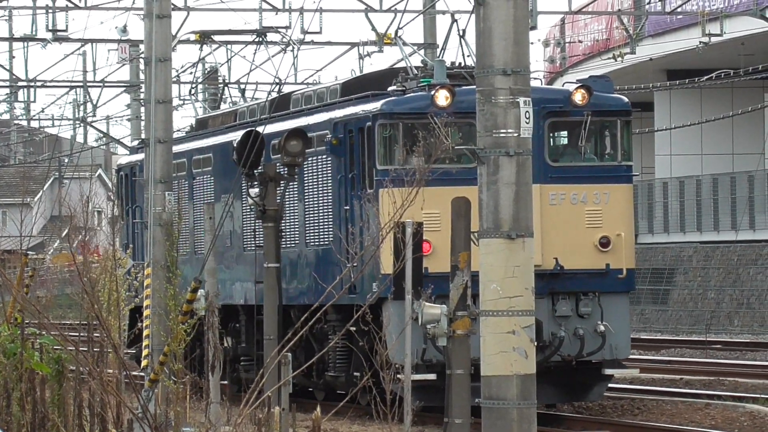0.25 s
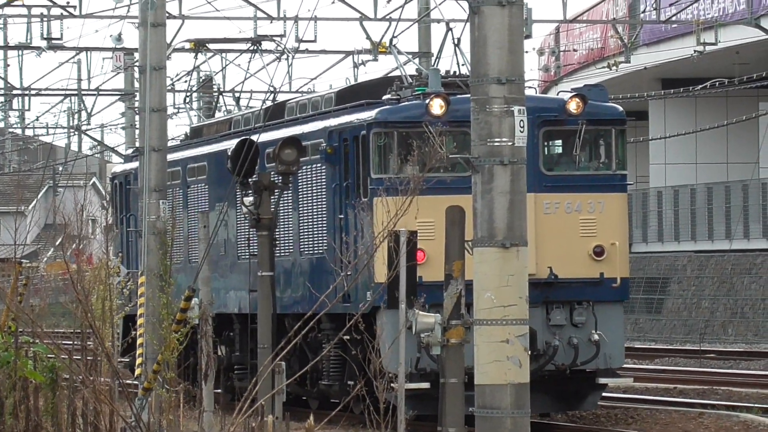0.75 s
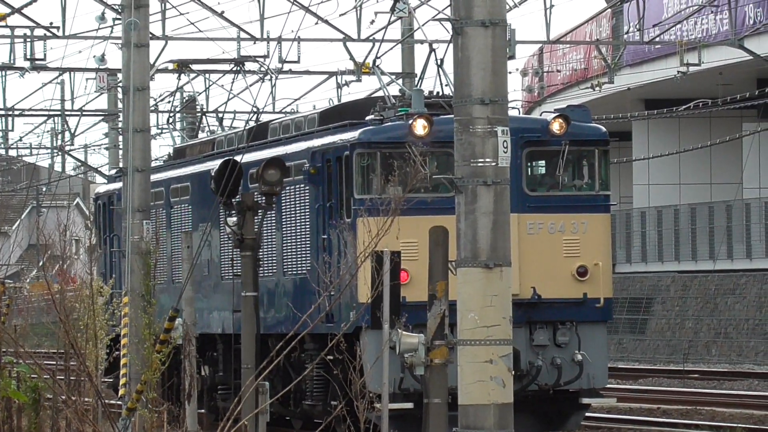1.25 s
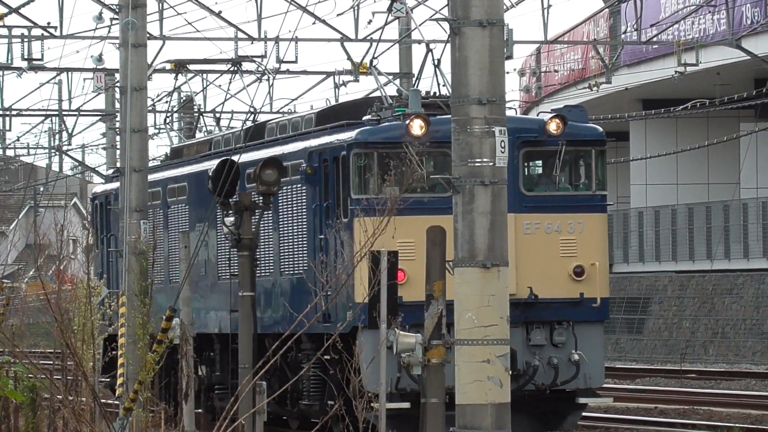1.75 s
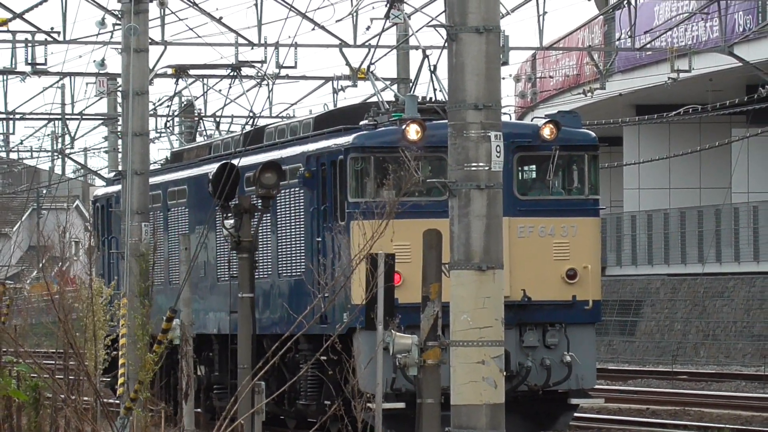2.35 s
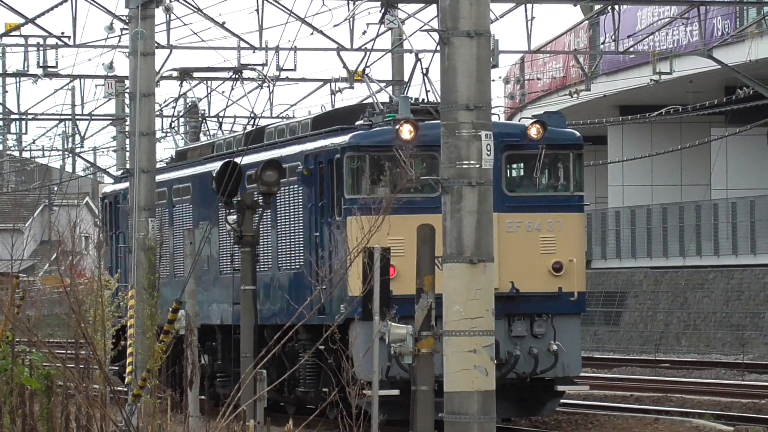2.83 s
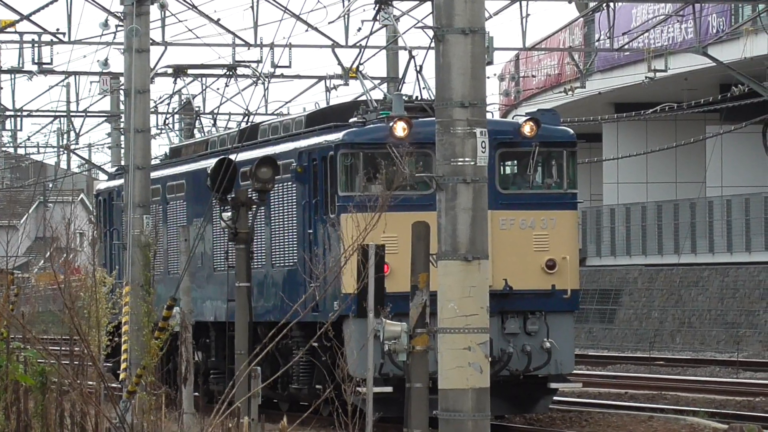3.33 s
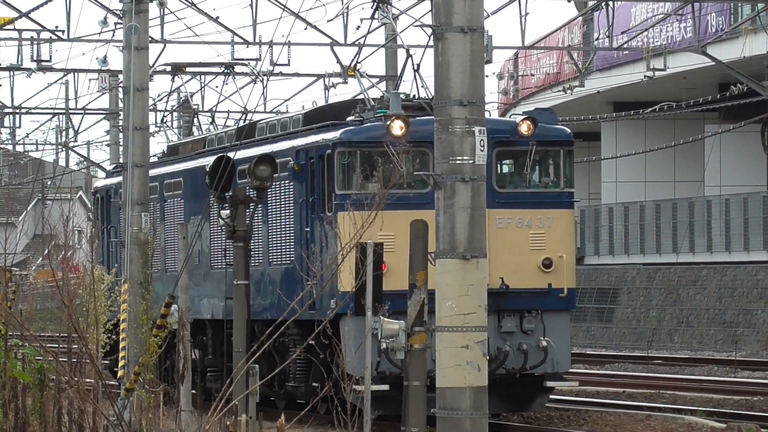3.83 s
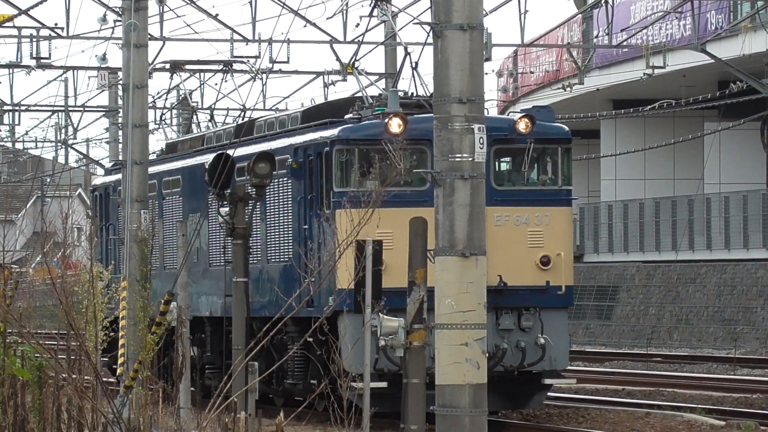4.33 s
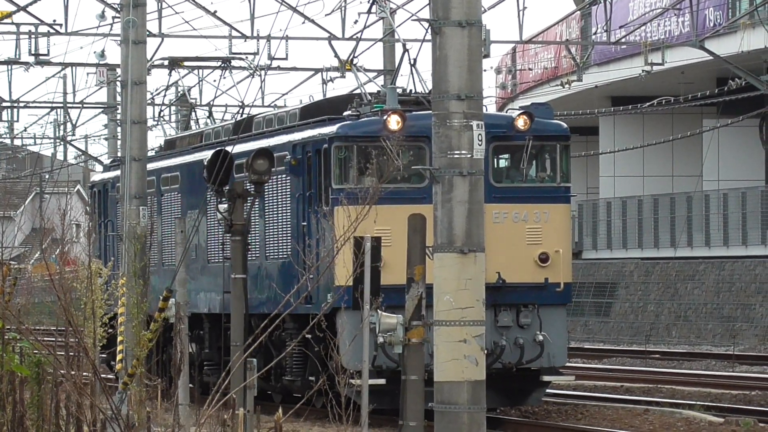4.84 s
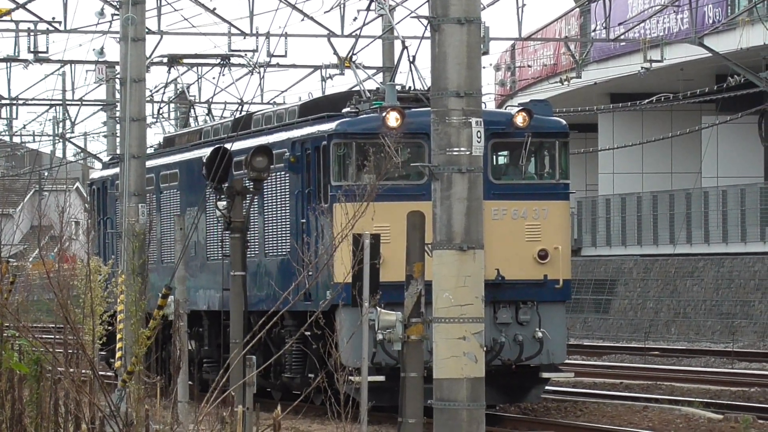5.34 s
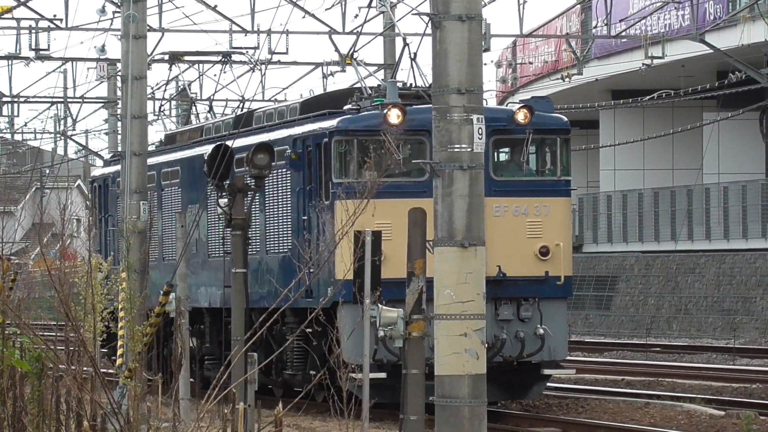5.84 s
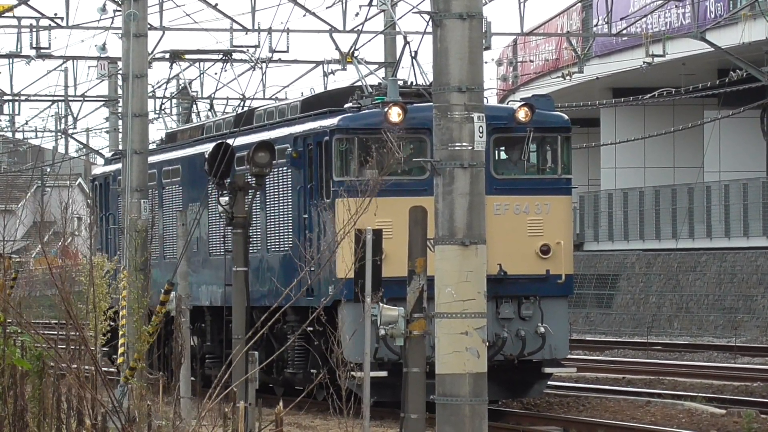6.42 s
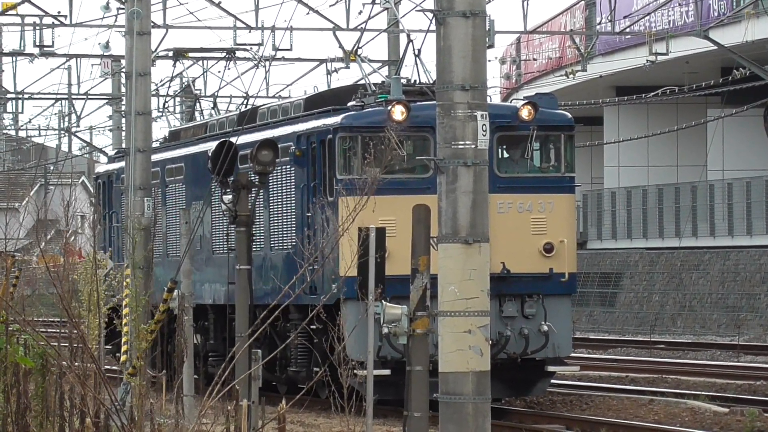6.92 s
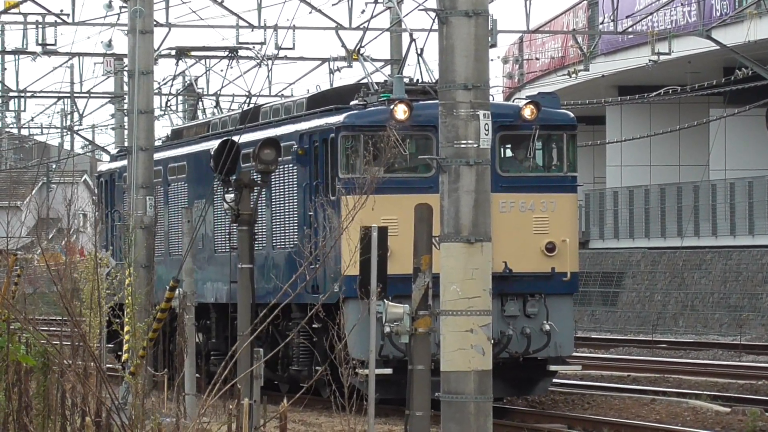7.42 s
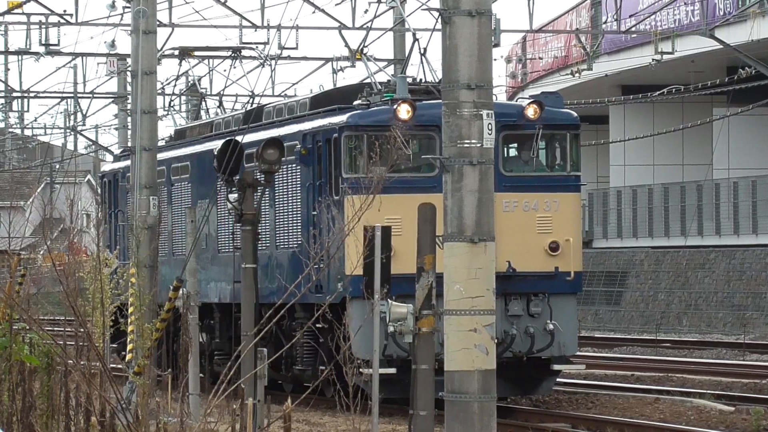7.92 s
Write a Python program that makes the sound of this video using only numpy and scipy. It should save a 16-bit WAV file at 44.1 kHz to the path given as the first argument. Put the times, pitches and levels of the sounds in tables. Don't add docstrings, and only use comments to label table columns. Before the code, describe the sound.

An electric locomotive's cooling fans drone in a steady beating hum with rushing air, then brakes squeal shrilly and air hisses out briefly.

```python
import sys
import numpy as np
from scipy import signal
from scipy.fft import rfft, irfft, next_fast_len
from scipy.io import wavfile
from scipy.ndimage import uniform_filter1d, minimum_filter1d, map_coordinates

SR = 44100
rng = np.random.default_rng(int(sys.argv[2]) if len(sys.argv) > 2 else 0)


def linear_from_db(decibels):
    return 10 ** (np.asarray(decibels, float) / 20)


def materialize(psi):
    bounded = np.clip(np.atleast_2d(psi).T, -1, 1)
    quanta = np.round(bounded * 32767).astype(np.int16)
    wavfile.write(sys.argv[1], SR, quanta)


N = 360285
SOUND_SPEED = 343
EARS = np.c_[[.5, -.5]]


def unit(x):
    return x / np.sqrt(np.mean(x ** 2) + 1e-20)


def along(points, hz):
    f, v = np.transpose(points)
    return np.interp(np.log(hz + 1), np.log(f + 1), v)


def curves(rows):
    s, *cols = np.transpose(rows)
    return [np.interp(np.arange(N) / SR, s, c) for c in cols]


def during(rows):
    t = np.arange(N) / SR
    return np.clip(np.minimum(t - rows[0][0], rows[-1][0] - t) / 0.015, 0, 1)


def wobble(rate, count=1):
    knots = rng.standard_normal((count, 400))
    coarse = np.arange(0, N + 64, 64)
    smooth = [map_coordinates(k, [coarse * rate / SR], order=2) for k in knots]
    return np.array([np.interp(np.arange(N), coarse, curve) for curve in smooth])


def swell(peak_s, hold_s, db, rise, fall):
    t = np.arange(N) / SR - peak_s
    return db - rise * np.clip(-t, 0, None) - fall * np.clip(t - hold_s, 0, None)


def filtered(x, response):
    m = next_fast_len(N + SR // 2)
    return irfft(rfft(x, m) * response(np.fft.rfftfreq(m, 1 / SR)), m)[..., :N]


def modes(table):
    def response(f):
        total = 0
        for k, (center, width, db) in enumerate(table):
            damping = 1j * f * width
            total = total + (-1) ** k * linear_from_db(db) * damping / (center * center - f * f + damping)
        return total
    return response


def rush(spectrum, alike, patchy_db, band):
    z = signal.stft(rng.standard_normal((2, N)), nperseg=512)[2]
    field = uniform_filter1d(rng.standard_normal(z.shape[1:]), size=6, axis=0)
    field = uniform_filter1d(field, size=14, axis=1)
    pair = signal.istft(z * linear_from_db(patchy_db * unit(field)), nperseg=512)[1][:, :N]
    closed = [(spectrum[0][0] / 2, -120)] + list(spectrum) + [(spectrum[-1][0] * 2, -120)]

    def shape(hz):
        turn = np.arccos(np.clip(along(alike, hz), -1, 1)) / 2
        return linear_from_db(along(closed, hz)) * [np.cos(turn), np.sin(turn)]

    mid, side = filtered(pair, shape)
    inside = filtered(mid, lambda hz: (hz > band[0]) & (hz < band[1]))
    return np.array([mid + side, mid - side]) / np.std(inside)


# (time [s], speed toward the camera [m/s])
APPROACH = [
    (0, 0),
    (4.5, 0),
    (5.5, .41),
    (9, .45),
]


def nearness():
    distance_m = 25
    return distance_m / (distance_m - np.cumsum(curves(APPROACH)[0]) / SR)


BLADES_HZ = [273.75, 282.97, 294.45, 303.25, 306.89, 311.35]
# (level [dB rms], five times)
BLADES_DB = [(-44, -46.5, -55, -62.5, -59.5), (-51, -46, -50, -55, -59), (-44.5, -43.5, -52, -58, -56),
             (-51.5, -49.5, -48.5, -52, -59), (-51, -44, -45.5, -52.5, -54),
             (-48, -38.5, -49.5, -60, -67.5)]
UPPER_DB = [-68, -69, -79]
FACING_DB_PER_S = [0, -0.5, -0.22, -0.05, -0.99, 0.3]
# (time [s], extra path [m])
BOUNCE = [
    (0, .12),
    (2.5, .135),
    (3.2, .185),
    (4.2, .185),
    (4.9, .07),
    (8.2, .03),
]
BOUNCE_SHIFT_M = [-.02, -.01, -.01, 0, 0, .005]


def fans():
    clock = np.cumsum(1 + curves(APPROACH)[0] / SOUND_SPEED) / SR
    path_m = curves(BOUNCE)[0]
    share = .5
    out = np.zeros((2, N))
    t = (np.arange(N) - N / 2) / SR
    for blade_hz, levels_db, shift_m, facing in zip(BLADES_HZ, BLADES_DB, BOUNCE_SHIFT_M, FACING_DB_PER_S):
        for k, db in enumerate([*levels_db, *UPPER_DB]):
            hz = (k + 1) * blade_hz
            drift = wobble(rate=0.775, count=3)
            start, apart, pan = rng.standard_normal(size=3)
            lag = 2 * np.pi * hz * (path_m + shift_m) / SOUND_SPEED
            comb = np.sqrt(1 + share ** 2 + 2 * share * np.cos(lag))
            ear_db = (1.5 * pan + 1.5 * drift[1]) * EARS
            gain = linear_from_db(db + facing * t + 1.5 * drift[0] + ear_db)
            ear_phase = (0.075 * apart + 0.19 * drift[2]) * EARS
            phase = 2 * np.pi * hz * clock + 2 * start + ear_phase + 0.2 * wobble(rate=4)
            out += np.sqrt(2) * comb * gain * np.sin(phase)
    return out * nearness()


# (frequency [Hz], level [dB rms])
WHINES = [(198, -52), (960, -57), (974, -59), (9168, -80), (9195, -73), (13065, -88)]


def motors():
    t = np.arange(N) / SR
    total = 0
    for hz, db in WHINES:
        gain = np.sqrt(2) * linear_from_db(db + 1.6 * wobble(rate=1.8, count=2))
        total = total + gain * np.sin(2 * np.pi * hz * t + 0.78 * wobble(rate=2.2, count=2))
    return total


# (frequency [Hz], level [dB per Hz])
RUMBLE = [(12, -58), (20, -18), (234, 2.5), (260, -2.5), (340, -4), (570, -120)]
# (frequency [Hz], level [dB per Hz])
DUCT = [(150, -38.5), (240, -9), (300, -1.5), (345, -7), (365, -8), (440, -11.5), (520, -6), (600, 0),
        (720, -8.5), (770, -10.5), (1250, -14.5), (1300, -16.5), (1600, -21.5), (2250, -33.5)]
# (frequency [Hz], level [dB per Hz])
HISS = [(1180, -40), (2000, -7), (2120, -4), (2350, -9.5), (2540, -7.5), (2940, -10.5), (3670, -9.5),
        (6030, -24), (8790, -18.5), (9180, -20), (10000, -24.5), (13500, -31.5), (15500, -34)]
# (frequency [Hz], left-right likeness [0-1])
ALIKE = [(30, .55), (80, 0.9), (130, 1), (290, 0.88), (640, 0.77), (1410, 0.56), (3100, 0.57), (6820, 0.11),
         (15000, .15)]


def air():
    rumble = linear_from_db(-39.5) * rush(RUMBLE, ALIKE, patchy_db=.8, band=(60, 240))
    duct = linear_from_db(-40) * rush(DUCT, ALIKE, patchy_db=1.0, band=(650, 800))
    hiss = linear_from_db(-58.5) * rush(HISS, ALIKE, patchy_db=1.0, band=(2300, 3400))
    return (rumble + duct + hiss) * nearness()


# (time [s], peak level [dB])
TICK = [
    (0.118, -33),
]
# (frequency [Hz], width [Hz], level [dB])
TICK_MODES = [(3900, 1200, 0), (7460, 2500, -2), (9050, 1540, 4), (12500, 2500, -22)]


def tick():
    t = np.arange(400) / SR
    blows = np.zeros(N)
    for s, db in TICK:
        decay = linear_from_db(db + 5 - 60 * t / 0.0094)
        blows[round(s * SR):][:len(t)] = decay * rng.standard_normal(len(t))
    return filtered(blows, modes(TICK_MODES))


def walls(x, t60, delay):
    t = np.arange(SR) / SR
    tail = rng.standard_normal((2, SR)) * linear_from_db(-60 * t / t60) * (t > delay)
    return signal.fftconvolve(x[None], tail / np.linalg.norm(tail[0]), axes=1)[:, :N]


# (time [s], frequency [Hz], level [dB])
SHOE = [
    (4.25, 7015, -72),
    (4.3, 7017, -42),
    (4.42, 7030, -36),
    (4.6, 7078, -36),
    (4.69, 7108, -29),
    (4.76, 7118, -42),
    (4.86, 7126, -45),
    (5.0, 7132, -57),
    (5.18, 7138, -64),
]
# (peak time [s], hold [s], peak level [dB], rise [dB/s], fall [dB/s])
SWELLS = [
    (4.605, .035, -44, 90, 78),
    (4.39, .05, -45, 600, 70),
    (4.385, .23, -51.5, 500, 95),
]
MIXING = [(2, 0, 0), (1, 1, 0), (1, 0, 1), (0, 2, 0), (0, 1, 1), (1, 0, -1), (0, 0, 3)]
MIXING_DB = [-26, -11, -18, -15, -7, -14, -24]
# (frequency [Hz], width [Hz], level [dB])
TYRE = [(3494, 30, -11), (3620, 30, -10), (4204, 25, -7), (6150, 70, -20), (7310, 90, -9), (7840, 60, -13),
        (8020, 120, -17), (8620, 30, -10), (8710, 25, -8), (8890, 18, 2), (9140, 16, 0), (9440, 16, -4),
        (9665, 18, 1), (10100, 300, -20), (10400, 30, -14), (10600, 60, -12)]
# (frequency [Hz], width [Hz], level [dB])
GRIND = [(2750, 300, -12), (3300, 460, -25)]


def squeal():
    middle_hz, low_hz = 5274, 4386
    main_hz, main_db = curves(SHOE)
    middle_db, low_db, scrape_db = [swell(*row) for row in SWELLS]
    t = np.arange(N) / SR
    grip = np.clip((t - 4.37) / 0.06, .05, 1)
    turns = np.array([np.cumsum(main_hz) / SR, middle_hz * t, low_hz * t])
    turns = turns + np.c_[[0.2, .15, .17]] * grip * wobble(rate=70, count=3)
    levels_db = np.array([main_db, middle_db, low_db])
    levels_db = levels_db + np.c_[[4, 3, 3]] * grip * wobble(rate=60, count=3)
    sound = np.sqrt(2) * np.sum(linear_from_db(levels_db) * np.sin(2 * np.pi * turns), axis=0)
    for times, db in zip(MIXING, MIXING_DB):
        weight = np.abs(times) / np.sum(np.abs(times))
        sound += linear_from_db(db + weight @ levels_db) * np.sin(2 * np.pi * (np.array(times) @ turns))
    noise = rng.standard_normal(N)
    ring = modes(TYRE + GRIND)
    scale = np.std(filtered(noise, ring))
    rubbing = noise * during(SHOE) * linear_from_db(scrape_db + 5.0 + 3 * wobble(rate=25)[0])
    return during(SHOE) * sound + filtered(rubbing, ring) / scale


# (start [s], length [s], frequency [Hz], level [dB])
FLARES = [(4.37, .055, 9690, -49), (4.375, .015, 9440, -53), (4.43, .03, 4195, -49),
          (4.445, .04, 9440, -48), (4.5, .1, 9140, -49), (4.51, .08, 9660, -45), (4.52, .1, 8890, -44),
          (4.55, .09, 3600, -56), (4.61, .04, 10600, -55), (4.63, .1, 3480, -57), (4.44, .07, 2660, -58)]


def flares():
    t = np.arange(N) / SR
    waver = wobble(rate=26, count=len(FLARES))
    total = 0
    for (s, length, hz, db), w in zip(FLARES, waver):
        level_db = swell(s + .01, length, db, rise=600, fall=400) + 3.5 * w
        total = total + np.sqrt(2) * linear_from_db(level_db) * np.sin(2 * np.pi * hz * t + 1.0 * w)
    return total


# (frequency [Hz], level [dB per Hz])
JET = [(1470, -34), (2500, -4), (3190, -6), (3890, -1), (5400, -5), (5700, -8), (8730, -0.5), (12000, -11),
       (14100, -22), (15500, -30)]


def vent():
    vent_s, open_s, fill_s, shut_s = 5.11, .05, .15, 5.56
    t = np.arange(N) / SR
    after = lambda s: np.clip(t - s, 0, None)
    level_db = -48.8 + .3 * wobble(rate=37)[0]
    level_db -= 4.5 * np.clip(1 - after(vent_s + open_s) / fill_s, 0, 1)
    level_db -= 7 * after(vent_s + open_s + fill_s)
    level_db -= 2.5 * (1 - np.exp(-after(shut_s) / .03))
    level_db -= 36 * after(shut_s)
    opening = np.clip(after(vent_s) / open_s, 0, 1)
    jet = rush(JET, [(3000, 0.46), (7000, 0.12)], patchy_db=.7, band=(6000, 12000))
    return opening * linear_from_db(level_db) * jet


def scene():
    wheel, brief, click = squeal(), linear_from_db(-1.5) * flares(), tick()
    direct = (wheel + brief) * linear_from_db([[-4], [-5.5]])
    echo = linear_from_db(-5) * walls(wheel + linear_from_db(-8) * brief, t60=0.98, delay=.02)
    near = click * linear_from_db([[.4], [-.4]]) + linear_from_db(-16) * walls(click, t60=.05, delay=0.0009)
    return fans() + motors() + air() + near + direct + echo + vent()


# (frequency [Hz], left minus right [dB])
LEAN = [(60, -1.5), (130, -3), (290, 1), (640, 1.0), (1410, -1), (3100, -2), (6820, 1), (15000, 1)]
# (frequency [Hz], left leads by [rad])
LEAD = [(35, 1.5), (70, 1.1), (110, .6), (170, .3), (430, .3), (1300, .15), (3000, 0)]


def microphones(x):
    def response(hz):
        ports = linear_from_db(along(LEAN, hz) * EARS) * np.exp(1j * along(LEAD, hz) * EARS)
        return ports / np.sqrt(1 + (30 / (hz + 1)) ** 8)
    return filtered(x, response)


# (frequency [Hz], level relative to the usual [dB])
QUIET = [(4300, -12), (5200, -5), (6200, -2.2), (7500, -3.5), (9000, -6), (11000, -2.6), (13000, -1.9),
         (15000, -.5)]


def starve(x):
    hz, _, z = signal.stft(x, SR, nperseg=1024)
    local = uniform_filter1d(np.mean(np.abs(z) ** 2, axis=0), size=4, axis=0)
    local = uniform_filter1d(local, size=5, axis=1)
    over_db = 10 * np.log10(np.abs(local) / np.median(local, axis=1, keepdims=True) + 1e-20)
    whistle_db = minimum_filter1d(over_db[hz > 5000], size=7, origin=3).max(axis=0)
    strain = np.clip((whistle_db - 23) / 9, 0, 1)
    bar_db = along(QUIET, hz)[:, None] + 5.5 * strain
    kept = np.clip(over_db - bar_db + .5, .02, 1)
    kept[hz < QUIET[0][0]] = 1
    return signal.istft(z * kept, SR, nperseg=1024)[1][:, :N]


def low_pass(x):
    return signal.sosfilt(signal.butter(12, 15440, fs=SR, output="sos"), x)


def record(dry):
    mix = starve(microphones(dry))
    return low_pass(mix)


dry = scene()
out = record(dry)
materialize(out)
```